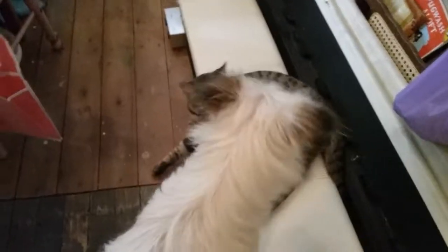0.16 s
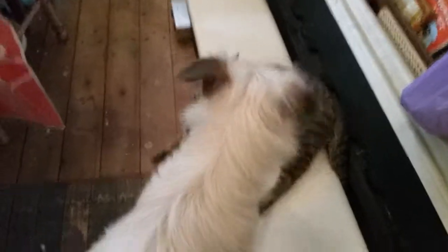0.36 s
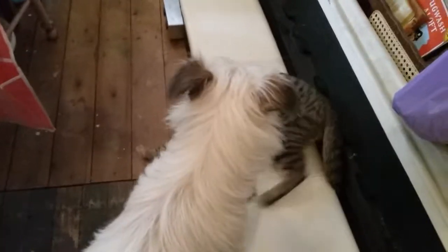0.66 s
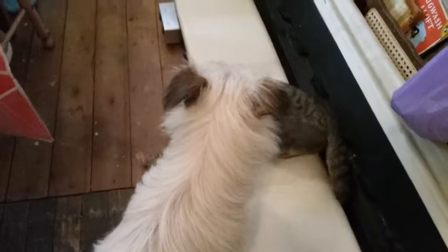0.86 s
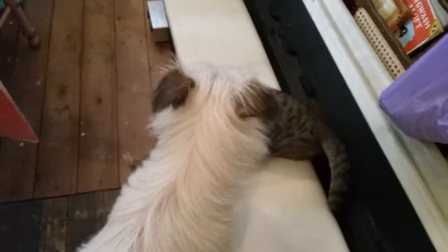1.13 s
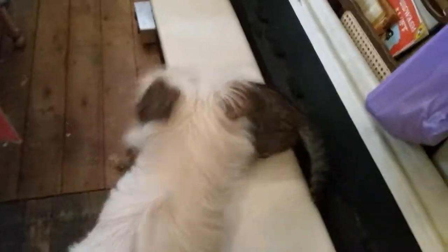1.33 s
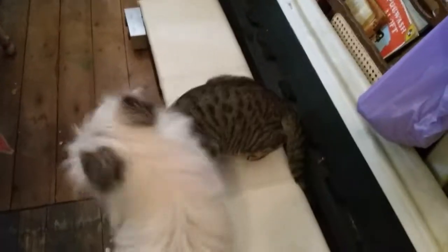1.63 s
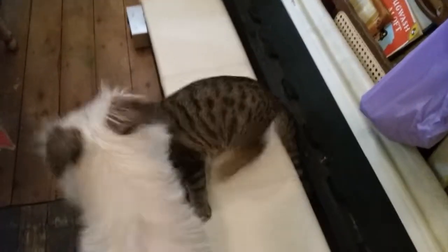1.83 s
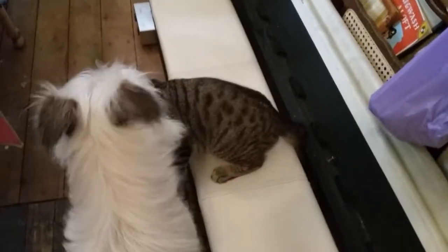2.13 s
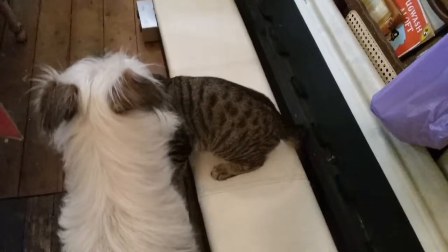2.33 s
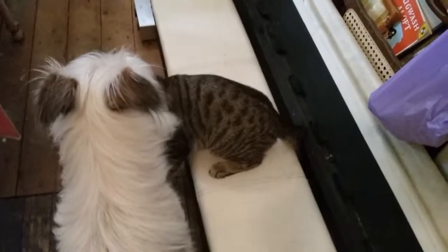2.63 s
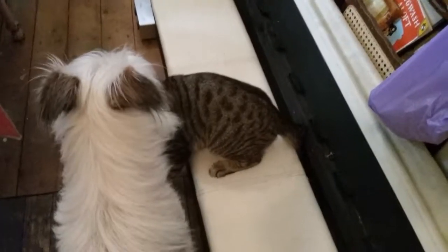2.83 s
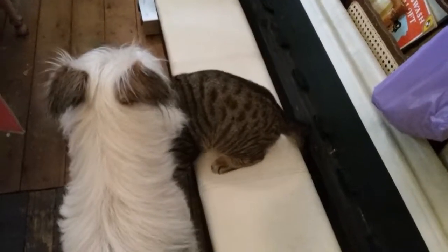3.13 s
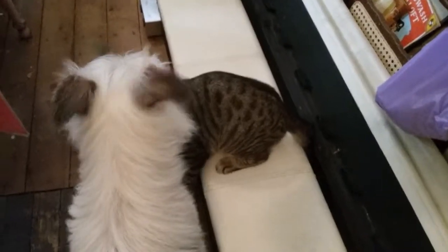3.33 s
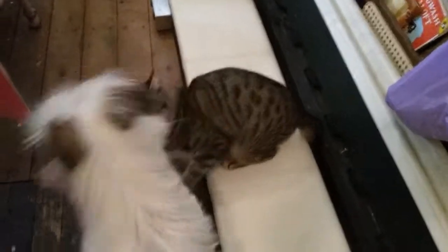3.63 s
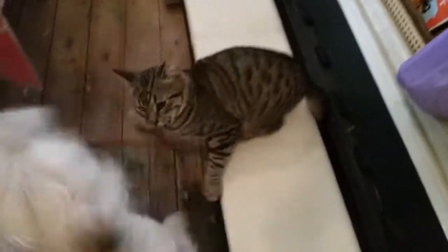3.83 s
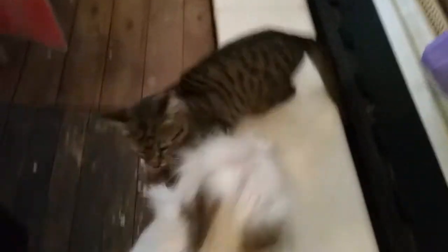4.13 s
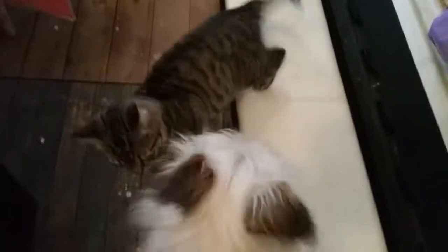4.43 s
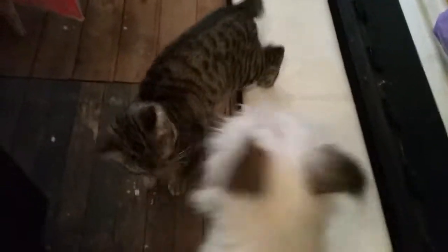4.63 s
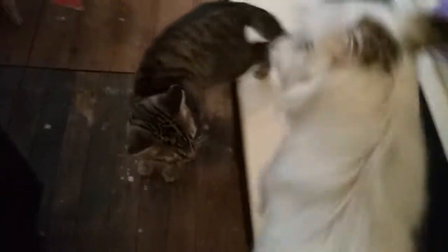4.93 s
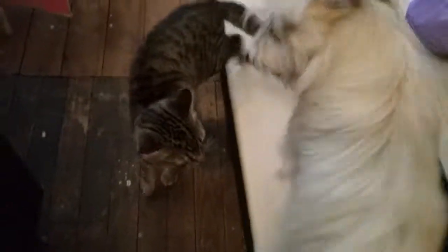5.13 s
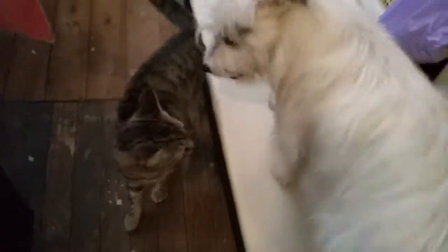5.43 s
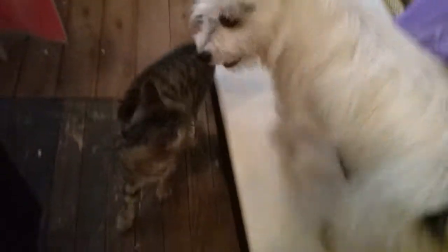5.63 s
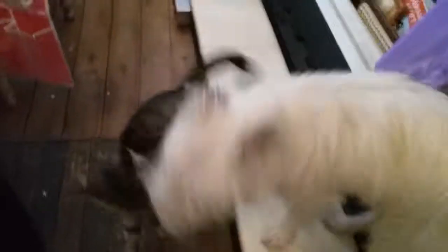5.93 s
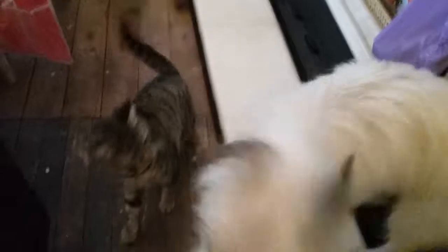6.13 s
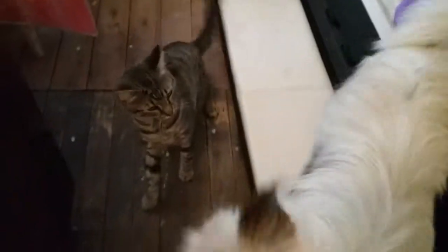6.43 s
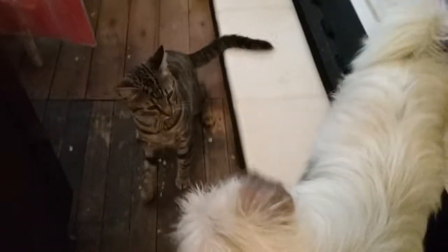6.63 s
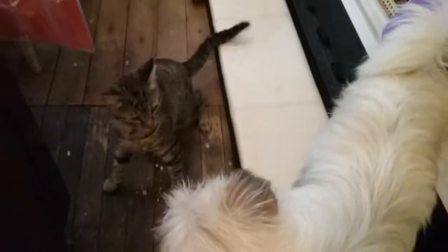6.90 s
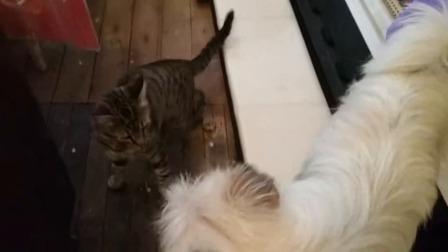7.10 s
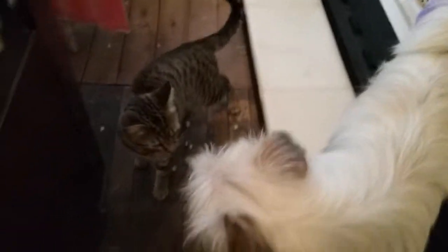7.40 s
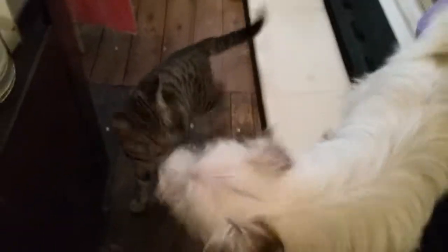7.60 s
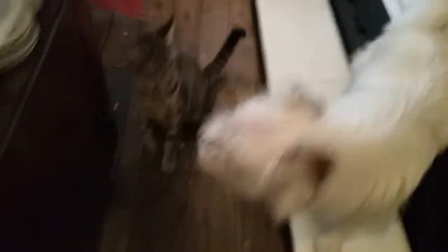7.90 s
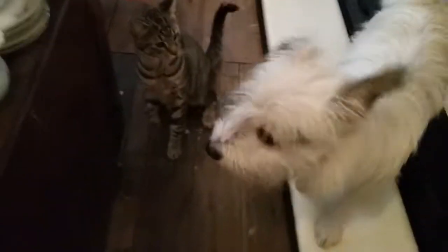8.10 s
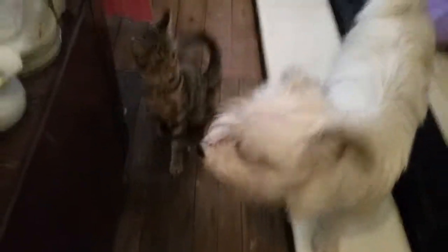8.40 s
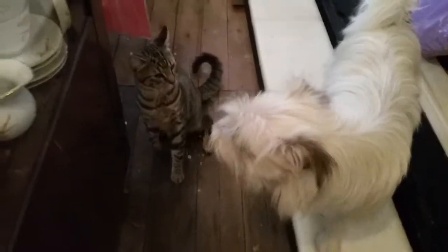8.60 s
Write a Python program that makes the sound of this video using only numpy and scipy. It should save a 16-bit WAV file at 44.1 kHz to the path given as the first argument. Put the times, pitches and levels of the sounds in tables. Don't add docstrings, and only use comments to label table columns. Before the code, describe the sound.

A phone hears a small live wooden room from a metre away, with low house hum and faint hiss. Barely audible sniffing precedes a short, falling cat mew at 1.25-1.6 s. Soft boomy paw thuds, claw ticks and a brief sniff follow until 2.3 s, then near quiet with a faint squeak. From 3.3 to 4.2 s the cat gives a wavering, nasal yowl, opening up over thumps. At 4.1-4.4 s come a strong sniff, brushing fur and sharp claw snaps; at 4.8 s a dry hollow rap. Panting puffs, scuffs, nostril whistles and clicks crowd on to 6.5 s, with the heaviest thud at 6.2 s. Faint breathy whimpers follow. At 7.6 s a piercing tenth-of-a-second dog yelp jumps up in pitch, distorts harshly and echoes until about 8.1 s. The background drops quieter, with weak thuds and a tiny squeak at 8.7 s.

```python
import sys
import numpy as np
from scipy import signal
from scipy.fft import rfft, irfft, next_fast_len
from scipy.io import wavfile
from scipy.ndimage import uniform_filter1d

SR = 44100
rng = np.random.default_rng(int(sys.argv[2]) if len(sys.argv) > 2 else 0)


def waveform_to_disk(signal):
    frames = np.transpose(np.atleast_2d(signal))
    scaled = np.clip(frames, -1, 1) * 32767
    samples = np.round(scaled).astype(np.int16)
    wavfile.write(sys.argv[1], SR, samples)


def invert_db(x):
    u = np.asarray(x, float) / 20
    return 10 ** u


N = 386316


def level(x, db):
    return x * invert_db(db) / np.sqrt(np.mean(x ** 2))


def track(table, edge=0.014):
    s, *columns = np.transpose(table)
    t = np.arange(N) / SR
    gate = np.clip(np.minimum(t - s[0], s[-1] - t) / edge + 1, 0, 1)
    return gate, [np.interp(t, s, column) for column in columns]


def slope(points, hz):
    f, db = np.transpose(points)
    return np.interp(np.log(np.maximum(hz, 1)), np.log(f), db, left=-120, right=-120)


def ports(mid, side):
    alike_hz = 430
    side = signal.lfilter(*signal.butter(1, alike_hz, "high", fs=SR), side)
    return np.array([mid + side, mid - side])


def hiss(points):
    size = next_fast_len(N)
    shape = invert_db(slope(points, np.arange(size // 2 + 1) * SR / size))
    mid, side = irfft(rfft(rng.standard_normal((2, size))) * shape, size)[:, :N]
    return level(ports(mid, side), 0)


def walk(rate):
    k = int(SR / rate)
    steps = np.repeat(rng.standard_normal(N // k + 1), k)
    return 1.15 * uniform_filter1d(steps, k)[:N]


def add(out, s, piece):
    i = int(s * SR)
    out[..., i:i + piece.shape[-1]] += piece[..., :N - i]


def bandpass(x, low_hz, high_hz):
    return signal.sosfilt(signal.butter(2, [low_hz, high_hz], "band", fs=SR, output="sos"), x)


# time in seconds, pitch in Hz, level in dB.
YELP_PATH = [(7.592, 1170, -40), (7.596, 1175, -22), (7.6, 1180, -11), (7.609, 1190, -5),
             (7.614, 1480, -5.5), (7.626, 1535, -1.7), (7.642, 1540, -1), (7.654, 1535, -1.7),
             (7.668, 1537, -.8), (7.685, 1510, -1.4), (7.692, 1360, -15), (7.712, 780, -22),
             (7.722, 740, -34)]
# pitch in Hz, left port over right in dB.
YELP_LEAN = [(600, -2), (1190, 9), (1400, -3), (1540, -6), (1700, -6)]
# pitch in Hz, octave over fundamental in dB.
YELP_OCTAVE_LEVEL = [(600, -26), (1190, -32), (1370, -6), (1540, -14), (1700, -14)]
YELP_PARTIALS = [-18, -21, -30, -30]


def yelp():
    gate, (hz, right_db) = track(YELP_PATH)
    left_db = right_db + slope(YELP_LEAN, hz)
    octave_db = slope(YELP_OCTAVE_LEVEL, hz)
    phase = 2 * np.pi * np.cumsum(hz) / SR + np.array([[1.4], [0]])
    octave = np.sin(2 * phase - [[4.4], [1.3]])
    tone = np.sin(phase) + invert_db([octave_db + 6, octave_db - 3]) * octave
    for number, db in enumerate(YELP_PARTIALS, 3):
        tone += invert_db(db + octave_db) * np.sin(number * phase)
    air = hiss([(700, 1.0), (1300, 8.5), (2400, 0.0), (3300, -7.5), (3900, -27.5),
                (4600, -16), (7000, -14.5), (8000, -34.0)])
    tone += invert_db(octave_db - 14.0) * air
    return gate * tone * invert_db([left_db, right_db])


# frequency in Hz, level in dB.
YELP_ROUGHNESS = [(600, -14), (800, -2.5), (1300, -2.5), (2300, 1), (3200, -3.5), (3600, -24.5),
                  (7500, -27.5)]


def scattered(cry):
    third = bandpass(cry, 4450, 4800)
    rasp = uniform_filter1d(np.abs(cry), size=200) * hiss(YELP_ROUGHNESS)[0]
    return (cry + invert_db(10) * third) * (1 + .1 * walk(400)) + invert_db(-16) * rasp


# frequency in Hz, level in dB over its peak.
CAT_TOP = [(1500, -36), (3200, -17), (4200, -17), (4900, -15), (5500, -11), (5900, -1), (6300, -1),
           (6900, -8), (8000, -22), (11000, -36)]


def cat(pitch, mouth):
    gate, (effort_db, mouth_hz, jaw) = track(mouth, 0.0063)
    hz = track(pitch)[1][0]
    phase = 2 * np.pi * np.cumsum(hz * (1 + .005 * walk(60))) / SR
    blur_db = 6 * uniform_filter1d(np.abs(np.gradient(hz)) * SR / 1000, size=900)

    first_db = -58 + .45 * (effort_db + 40)
    second_db = effort_db - 19 + jaw * 16
    top_db = effort_db - 31 + jaw * 25.5
    low = [first_db, second_db]
    for number in (3, 4):
        off_khz = (number * hz - mouth_hz) / 1000
        loss_db = np.maximum(43 * off_khz, -20 * off_khz)
        low.append(effort_db - np.minimum(loss_db, 24))
    skirt_db = np.maximum(low[2] - 8, low[3]) - 12
    for number in (5, 6):
        off_khz = np.abs(number * hz - 3000) / 1000
        low.append(effort_db - 19.5 + jaw - 24.5 * off_khz)

    out = 0
    for k, db in enumerate(low):
        waver_db = 2.5 * walk(25) + 2.6 * walk(110)
        out = out + invert_db(db + waver_db) * np.sin((k + 1) * phase + k * k)
    for k in range(7, 18):
        db = top_db + slope(CAT_TOP, k * hz) + 4.5 * walk(25) - 2 - blur_db
        out += invert_db(db) * np.sin(k * phase + k * k)
    rim = invert_db(top_db - 8) * hiss(CAT_TOP)[0]
    rasp = invert_db(skirt_db - 11) * hiss([(1500, 12), (2400, -6), (3200, -14.0), (4500, -3.0)])[0]
    return gate * (np.sqrt(2) * out + rim + rasp)


# time in seconds, pitch in Hz.
MEW_PITCH = [
    (1.24, 665),
    (1.26, 620),
    (1.29, 655),
    (1.302, 575),
    (1.372, 592),
    (1.41, 510),
    (1.45, 496),
    (1.5, 505),
    (1.575, 498),
]
# time in seconds, effort in dB, mouth resonance in Hz, jaw opening 0 to 1.
MEW_MOUTH = [
    (1.244, -57, 2520, 0),
    (1.29, -37, 2110, 0.0),
    (1.345, -44, 2000, 0.32),
    (1.39, -38, 2110, 0.62),
    (1.425, -35.5, 2070, 0.45),
    (1.455, -41.5, 2060, 0.4),
    (1.48, -49, 2120, 0.6),
    (1.575, -55.5, 2080, 0.2),
]
# time in seconds, pitch in Hz.
YOWL_HZ = [(3.33, 602), (3.45, 632), (3.508, 622), (3.54, 572), (3.61, 576), (3.63, 583), (3.705, 529.8),
           (3.8, 558), (3.84, 556.4), (3.96, 532.2), (4.018, 561), (4.09, 533.2), (4.2, 539.6)]
# time in seconds, effort in dB, mouth resonance in Hz, jaw opening 0 to 1.
YOWL_MOUTH = [
    (3.315, -59, 1910, .3),
    (3.34, -41, 2050, 0.0),
    (3.47, -36.5, 2070, 0.47),
    (3.56, -32, 1780, 0.21),
    (3.68, -40.5, 1640, 0.56),
    (3.77, -31.5, 1690, 0.4),
    (3.87, -33, 2100, 0.6),
    (4.13, -36.5, 2105, 0.8),
    (4.24, -44, 2136, 0.78),
]


def cat_calls():
    return cat(MEW_PITCH, MEW_MOUTH) + cat(YOWL_HZ, YOWL_MOUTH)


def ring(modes, t60, chance, scatter_db=4., detune=0.0512, push_s=.0016):
    t = np.arange(int(.5 * SR)) / SR
    hz, db = np.transpose(modes)
    hz = (hz * (1 + detune * chance[0]))[:, None]
    decay = np.exp(-np.log(1000) * t / t60 * (hz / hz[0]) ** 0.53)
    waves = np.sin(2 * np.pi * hz * t + 1.315 * chance[2][:, None]) * decay
    y = invert_db(db + scatter_db * chance[1]) @ waves
    y = y * np.minimum(t / push_s, 1)
    return y / np.abs(y).max()


# frequency in Hz, level in dB.
BOARD_MODES = [(124, -0.5), (145, -0.5), (165, -8), (195, 3.5), (228, 1.5), (268, -7), (305, 4), (348, -2),
               (380, 0.5), (415, 1)]
# frequency in Hz, level in dB.
KNOCK_MODES = [(500, -1.5), (580, -5), (630, -1), (735, 1.5), (830, 1.5), (930, 4), (1090, -5.5),
               (1350, -7.5), (1700, -3.5), (2200, -12)]
# frequency in Hz, level in dB.
JOIST_MODES = [(48, -13), (58, -11), (66, 4), (71, 1), (78, -11), (86, 3), (94, 3.5), (101, 6), (108, -2.5),
               (116, -15.5)]
# start in seconds, peak in dB, knock over thud in dB, beam boom over thud in dB.
PAW_BLOWS = [(1.238, -46.5, 8, -12), (1.474, -40, -4, -9), (1.581, -43.5, 7, -27), (1.781, -20, -14, -10.5),
             (1.978, -22, -11.5, -14), (2.155, -30, -33, -3), (2.198, -30, -14.5, -23),
             (2.876, -48, -12, -1.5), (3.544, -34, -16.5, -4.5), (3.588, -30.5, -12.5, -11),
             (3.861, -35.5, -7, -6.5), (3.918, -33.5, 1, -20), (4.116, -35.5, -21, -15),
             (4.134, -33.5, -20, -1), (4.437, -23.5, -17.5, -10), (4.845, -46, -27, -48),
             (4.902, -36, 1.5, -23), (4.914, -31, 2, -6), (5.089, -38.5, -0.5, -11), (5.166, -43, -17, -30),
             (5.28, -41, -11, -27), (5.603, -40, -2, -18), (5.977, -33.5, -15, -12.5),
             (6.198, -12, -8, -13), (6.392, -23.5, -7, -11), (7.719, -42.5, -10.5, -5),
             (7.813, -42.5, 3, -3.5), (7.875, -37, -4, -26), (8.058, -44, -8, -32), (8.191, -44, -6.5, -8),
             (8.33, -45.5, -7.5, -24)]


def thuds():
    out = np.zeros(N)
    chances = rng.standard_normal((len(PAW_BLOWS), 4, 3, len(BOARD_MODES)))
    for (s, db, knock_db, boom_db), chance in zip(PAW_BLOWS, chances):
        blow = ring(BOARD_MODES, 0.22, chance[0], push_s=0.0056)
        blow = blow + invert_db(knock_db) * ring(KNOCK_MODES, 0.12, chance[1])
        blow = blow + invert_db(boom_db) * ring(JOIST_MODES, 0.43, chance[2], push_s=0.0062)
        add(out, s, invert_db(db) * blow)
        settle_s = s + .035 + 0.00802 * chance[3, 0, 0]
        settle_chance = np.hstack([chance[3], chance[1][:, :3]])
        add(out, settle_s, invert_db(db - 5.0) * ring(BOARD_MODES + KNOCK_MODES[:3], 0.23, settle_chance))
    return out


# start in
# seconds, peak in dB, body over tick in dB, air over tick in dB.
CLAW_TICKS = [(0.8689, -53.5, 7, -24), (1.1565, -56.5, 7, -33), (1.24, -65, 15, -21),
              (1.5808, -36, -1, -11), (1.7843, -32.5, -1.5, -3.5), (1.8816, -37.5, -1.5, -16.5),
              (1.9784, -55, 17, -15.5), (3.855, -37, -4, -14), (3.9644, -35, -12, -13), (4.115, -35, 0, -7),
              (4.1314, -23.5, -12, -7.5), (4.21, -38.5, -11, -3), (4.2425, -31.5, 8.5, -22),
              (4.3515, -19.5, -22, -4), (4.442, -46, 12, -12), (4.5093, -42.5, 1, -12),
              (4.5306, -34.5, 1, -13), (4.7762, -59, 8, -9), (4.815, -30.5, 4, -14.5),
              (4.8477, -41.5, -1, -4), (4.9671, -34, 1.5, -6), (5.0276, -50, -17, -10.5),
              (5.2202, -42, -16, -12), (5.2383, -40, -11, -10.5), (5.4533, -47, -21, -9.5),
              (5.4272, -45, -7, -14), (5.5724, -39.5, 4, -11.5), (5.608, -40, 5.5, -12),
              (5.91, -53.5, -0.5, -12), (5.9455, -44.5, 7.5, -9), (5.9809, -39, 4, -11.5),
              (5.986, -34.5, 7.5, -9), (5.633, -38.5, 6, -14.5), (6.056, -39.5, 2.5, -11),
              (6.1983, -41, 18.5, -21), (6.3225, -28, 4, -5.5), (6.392, -38, 3, -16.5),
              (6.565, -45.5, 1, -7.5), (6.631, -55, 10, -9), (6.6649, -53, 6, -7), (6.762, -60, 10.5, -0.5),
              (6.8544, -59, 10, 0.5), (7.3816, -50.5, -3, -14), (7.497, -62, -8, 3.5),
              (7.5434, -45.5, 5.5, -7.5), (8.192, -81, 3, -20), (8.3324, -63, 17, -21)]


def claws():
    out, t = np.zeros((2, N)), np.arange(1024) / SR
    ranges = [(456, 1820, 0.009), (1410, 5180, 0.0069), (4940, 14000, 0.0048)]  # (low Hz, high Hz, decay s)
    noises = rng.standard_normal((len(CLAW_TICKS), 2, 1024))
    for (s, db, body_db, air_db), noise in zip(CLAW_TICKS, noises):
        burst = ports(noise[0], .5 * noise[1])
        for (low_hz, high_hz, decay), part_db in zip(ranges, (body_db, 0, air_db)):
            fade = np.exp(-t / decay) + 0.87 * np.exp(-t / .0007)
            crack = bandpass(burst * fade, low_hz, high_hz)
            add(out, s, crack / np.abs(crack.mean(axis=0)).max() * invert_db(db + part_db))
    return out


# frequency in Hz, level in dB, time to die by 60 dB in seconds.
STEP_MODES = [(220, -4, 0.14), (606, -26, 0.069), (907, -4, 0.048), (1120, -13.5, 0.058), (1809, -43, 0.27),
              (2132, -28, 0.22), (3050, -28, 0.064), (3600, -41, 0.079)]


def tap():
    out, t = np.zeros(N), np.arange(int(.3 * SR)) / SR
    rap = 0
    for hz, db, t60 in STEP_MODES:
        rap = rap + invert_db(db) * np.sin(2 * np.pi * hz * t) * np.exp(-np.log(1000) * t / t60)
    add(out, 4.8145, invert_db(-23) * rap / np.abs(rap).max())
    return out


RISE_SHARES = {"scuff": 0.39, "puff": 0.64, "sniff": 0.4, "rub": 0.19}


def swells(events, kind):
    roundness = 1.25
    t, power = np.arange(0, N + 64, 64) / SR, 0
    for s, db, fade in events:
        late = (t - s) / max(fade, .01)
        drop_db = 10 * np.maximum(late, -late / RISE_SHARES[kind]) ** roundness
        power = power + invert_db(db - drop_db) ** 2
    return np.interp(np.arange(N) / SR, t, np.sqrt(power))


# frequency in Hz, width in Hz, level in dB.
MOUTH_MODES = [(1584, 57, -0.5), (1724, 75, -2), (2010, 410, 4), (2305, 50, -2.5), (2570, 430, -1),
               (2970, 150, -6.5), (3160, 140, -10), (3900, 450, -9.5)]


def breath():
    air, out = ports(*rng.standard_normal((2, N))), 0
    for hz, width, db in MOUTH_MODES:
        b, a = signal.iirpeak(hz, np.clip(hz / (1.6 * width), .5, 12), SR)
        resonance = signal.lfilter(b, a, signal.lfilter(b, a, air))
        out = out + invert_db(db + 3. * walk(22)) * resonance
    return level(out, 0)


# frequency in Hz, level in dB.
SCUFF_COLOUR = [(150, -37), (250, -4), (343, -5.5), (529, -6.5), (638, -3), (709, -4.5), (1260, -8.5),
                (1500, -23.5), (1950, -37), (3300, -120)]
# frequency in Hz, level in dB.
NOSE_COLOUR = [(2820, -49.5), (4800, -17.5), (5840, -14), (6400, -7), (6610, -4), (6970, -6.5), (7380, -13),
               (7760, -25.5), (8500, -27.5), (11000, -57.5), (18700, -120)]
# frequency in Hz, level in dB.
FUR_COLOUR = [(4470, -36.5), (7600, -5), (8780, 0), (10600, -2), (11100, -2), (15100, -3.5), (15600, -13.5)]
# peak time in seconds, peak in dB, time to fade 10 dB in seconds.
PAD_SCUFFS = [(.885, -68, 0.3), (1.02, -61.5, 0.26), (1.45, -55.5, 0.29), (1.6, -51, 0.14), (1.72, -69, 0),
              (1.82, -48.5, 0.2), (2.07, -62.5, 0.42), (2.34, -75, 0.3), (2.85, -67, 0.1), (3.9, -52, 0.43),
              (4.14, -45, 0.27), (4.28, -64, 0.9), (4.51, -60.5, 0.7), (4.9, -62, 0.57), (5.11, -52.5, 0.4),
              (5.305, -38.5, 0.0441), (5.5, -51.5, 0.23), (5.66, -46, 0.09), (6.01, -36.5, 0.12),
              (6.25, -37.5, 0.1023), (6.44, -47.5, 0.12), (6.83, -58, -0.27), (7.05, -75, 0.3),
              (7.56, -52.5, 0.07), (8.06, -69.5, 0.5), (8.37, -57.5, 0.08)]
# peak time in seconds, peak in dB, time to fade 10 dB in seconds.
MOUTH_PUFFS = [(.93, -70.5, 0.15), (1.43, -47, 0.07), (1.84, -63.5, 0.36), (2.03, -79, -0.1),
               (2.8, -67, -0.29), (3.55, -60, 0.19), (3.975, -43.5, 0.1), (4.362, -41.5, 0.04),
               (4.545, -41, 0.05), (4.71, -54, 0.24), (4.89, -48, 0.13), (5.045, -55.5, 0.46),
               (5.106, -35, 0.0225), (5.15, -46.5, 0.1), (5.24, -51, 0.2), (5.302, -35.5, 0.02),
               (5.46, -47.5, 0.18), (5.527, -44.5, 0.06), (5.735, -40, 0.04), (6.0, -47, 0.14),
               (6.2, -44.5, 0.13), (6.42, -36.5, -0.0168), (6.58, -52.5, 0.04), (6.68, -72.5, 0),
               (6.83, -57, -0.03), (7.04, -65, -0.5), (7.17, -78, -0.24), (7.36, -70, 0.5),
               (7.585, -36, -0.006), (7.93, -50.5, 0.05), (8.36, -75.5, 0.3)]
# peak time in seconds, peak in dB, time to fade 10 dB in seconds.
NOSE_SNIFFS = [(.45, -79, 0.5), (.86, -73.5, 0.4), (1.47, -64.5, 0.31), (1.82, -49, 0.0745),
               (1.9, -62, 0.11), (2.02, -74.5, 0.23), (4.135, -34, -0.04), (4.27, -44, 0.194),
               (4.54, -71.5, 1.86), (4.88, -51, 0.06), (5.1, -45.5, 0.05), (5.28, -47.5, 0.08),
               (5.5, -51, 0.08), (5.72, -56, 0.12), (6.03, -51, 0.1149), (6.2, -52, 0.16), (6.32, -51, 0.1),
               (6.58, -51, 0.04), (6.8, -73.5, 0.25), (7.06, -70, 0.03), (7.34, -72, 0.43),
               (7.56, -61.5, 0.3), (8.35, -77.5, 0)]
# peak time in seconds, peak in dB, time to fade 10 dB in seconds.
FUR_RUBS = [
    (1.6, -77, 0),
    (3.6, -72.5, 1),
    (1.8, -59, -0.11),
    (4.135, -56, 0.23),
    (4.28, -48, -0.32),
    (4.98, -69.5, 0.6),
    (6.1, -67, 0.39),
    (6.33, -72.5, 0.6),
]


def stir():
    shared_db = .9 * walk(45)
    puffs = swells(MOUTH_PUFFS, "puff")
    high_hiss = np.hypot(swells(FUR_RUBS, "rub"), invert_db(-22.5) * puffs)
    # (gain, noise, flicker dB, flickers per second)
    sources = [(swells(PAD_SCUFFS, "scuff"), hiss(SCUFF_COLOUR), 3.5, 120),
               (puffs, breath(), 2.5, 220),
               (swells(NOSE_SNIFFS, "sniff"), hiss(NOSE_COLOUR), 1.5, 30),
               (high_hiss, hiss(FUR_COLOUR), 2.5, 200)]
    return sum(gain * noise * invert_db(shared_db + db * walk(rate)) for gain, noise, db, rate in sources)


def whistles(table, share, edge_s):
    out = np.zeros((2, N))
    noises = rng.standard_normal((len(table), 2, 2, 16384))
    for (s, length, from_hz, to_hz, db), noise in zip(table, noises):
        t = np.arange(int(length * SR)) / SR
        slow = signal.lfilter(*signal.butter(2, share * from_hz, fs=SR), noise)[..., -len(t):]
        phase = 2 * np.pi * np.cumsum(from_hz + (to_hz - from_hz) * t / length) / SR
        band = slow[0] * np.cos(phase) + slow[1] * np.sin(phase)
        fade = np.minimum(np.minimum(t / edge_s, (length - t) / (2 * edge_s)), 1)
        add(out, s, level(ports(*band), db) * fade)
    return out


# start in seconds, length in seconds, from Hz, to Hz, level in dB.
NOSTRIL_WHISTLES = [
    (5.04, .085, 6700, 7160, -51),
    (5.225, 0.082, 6750, 7040, -44.5),
    (5.45, 0.084, 7050, 7180, -49),
    (6.3, 0.048, 6900, 7130, -58),
    (7.03, 0.089, 6700, 6660, -66),
    (5.5, 0.05, 1950, 1855, -48),
    (5.74, 0.097, 1850, 1870, -59),
]
# start in seconds, length in seconds, from Hz, to Hz, level in dB.
THROAT_WHIMPERS = [(4.85, 0.074, 3900, 3890, -50), (4.86, .06, 3200, 3090, -48),
                   (5.03, 0.044, 2100, 2030, -51), (5.21, 0.073, 1800, 2640, -61),
                   (6.65, 0.062, 3300, 3270, -59), (6.65, 0.074, 1050, 996, -57),
                   (6.65, 0.076, 2400, 2300, -60), (6.78, .11, 1480, 1470, -60),
                   (6.8, .1, 2450, 2560, -65.5), (6.8, .11, 3200, 3150, -74), (6.97, 0.23, 1700, 1645, -66),
                   (6.99, 0.11, 2900, 2860, -69.5), (6.98, .06, 700, 700, -64),
                   (7.145, 0.06, 2550, 2820, -59), (7.3, 0.11, 2600, 2600, -69.5),
                   (7.36, .06, 700, 697, -63.5)]
# start in seconds, length in seconds, from Hz, to Hz, level in dB.
STEP_GROANS = [
    (1.71, 0.065, 820, 806, -54),
    (5.15, 0.061, 234, 228, -50.5),
    (5.23, .08, 219, 231, -52.5),
    (5.58, 0.0686, 236, 228, -49.5),
]


def pinched_air_and_groans():
    out = whistles(NOSTRIL_WHISTLES, .02, .006)
    out = out + whistles(THROAT_WHIMPERS, .06, 0.014)
    return out + whistles(STEP_GROANS, .06, 0.0088)


# start in seconds, length in seconds, pitch in Hz, level in dB.
NOSTRIL_SQUEAKS = [
    (2.3, .08, 2400, -63),
    (.925, .03, 1300, -58),
    (6.79, .09, 1480, -66),
    (8.72, .08, 1950, -59),
    (8.725, .07, 2750, -61),
]


def squeaks():
    out = np.zeros(N)
    for s, length, hz, db in NOSTRIL_SQUEAKS:
        t = np.arange(int(length * SR)) / SR
        waver = np.cumsum(0.035 * rng.standard_normal(len(t)))
        add(out, s, invert_db(db) * np.hanning(len(t)) ** .5 * np.sin(2 * np.pi * hz * t + waver))
    return out


# frequency in Hz, time to die by 60 dB in seconds.
ROOM_DECAY = [(100, 0.68), (250, 0.57), (600, 0.53), (1500, 0.51), (3000, 0.55), (6000, 0.37),
              (12000, 0.06)]


def room():
    t = np.arange(int(.8 * SR)) / SR
    noise, echoes = ports(*rng.standard_normal((2, len(t)))), 0
    edges = [30, 160, 400, 950, 2100, 4200, 8500, 18000]
    for (hz, t60), low, high in zip(ROOM_DECAY, edges, edges[1:]):
        echoes = echoes + bandpass(noise, low, high) * np.exp(-np.log(1000) * t / t60)
    echoes = echoes * np.clip(t / 0.011, 0, 1)
    return echoes / np.sqrt(np.sum(echoes ** 2) / 2)


# frequency in Hz, level in dB.
HUM_COLOUR = [(12, -38.5), (20, -12.5), (22, -22), (70, -11), (112, -1), (162, -9.5), (196, -8),
              (324, -17.5), (416, -21), (453, -21), (934, -25.5), (1200, -31), (2090, -31), (4090, -39.5),
              (15600, -43.5)]
# time in seconds, level in dB.
HUM_GAIN = [
    (0, 2.5),
    (2.4, 1),
    (7.55, 2),
    (7.7, 6.5),
    (8.1, -7.5),
    (8.76, -12),
]


def house_hum(tilt):
    gain_db = track(HUM_GAIN)[1][0] + 2.7 * walk(45)
    return level(hiss(HUM_COLOUR), -65.5) * tilt * invert_db(gain_db)


# time in seconds, level in dB over their peak.
YELP_ECHO_LEVEL = [
    (7.58, -14),
    (7.68, -13),
    (7.694, -4),
    (7.735, -2.5),
    (7.77, -1),
    (7.82, -6),
    (7.98, -11),
    (8.1, -22),
    (8.2, -28),
]


def scene():
    cry, blows, ticks = yelp(), thuds() + tap(), claws()
    pinched, voice = pinched_air_and_groans(), cat_calls() + squeaks()

    tilt = invert_db([[.6], [-.6]])
    direct = np.array([voice, np.roll(voice, shift=7)]) * tilt
    direct = direct + blows * invert_db([[.7], [-.7]]) + cry + ticks + pinched + tilt * stir()

    send = invert_db(-10) * voice + invert_db(-7.0) * blows + invert_db(-3) * ticks[0] + invert_db(-12) * pinched[0]
    echoes = room()
    wet = signal.fftconvolve(send[None], echoes, axes=1)[:, :N]
    cry_wet = signal.fftconvolve(scattered(cry[1] + cry[0])[None], echoes, axes=1)[:, :N]
    cry_wet = cry_wet / np.abs(cry_wet).max(axis=1, keepdims=True)
    return direct + wet + cry_wet * invert_db(track(YELP_ECHO_LEVEL)[1][0]) + house_hum(tilt)


def low_pass(x):
    return signal.sosfilt(signal.butter(12, 15710, fs=SR, output="sos"), x)


def record(dry):
    left = np.clip(dry[0], -.97, .97)
    fine = signal.resample_poly(dry[1], 3, 1)
    right = signal.resample_poly((fine + 1) % 2 - 1, 1, 3)
    trimmed = signal.lfilter(*signal.butter(2, 46, "high", fs=SR), [left, right])
    return low_pass(trimmed)


dry = scene()
out = record(dry)
waveform_to_disk(out)
```